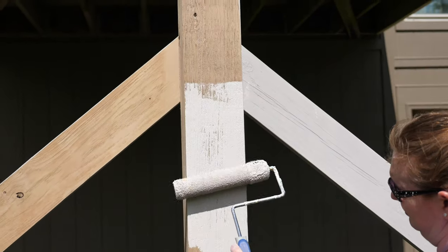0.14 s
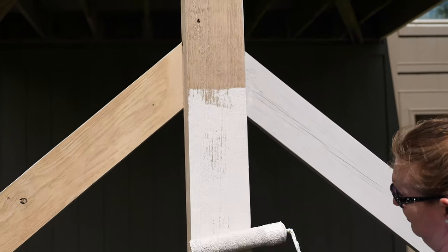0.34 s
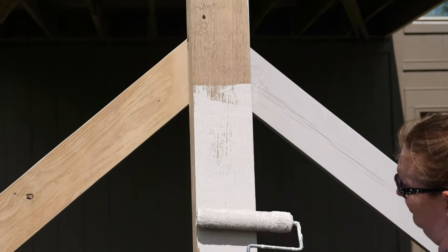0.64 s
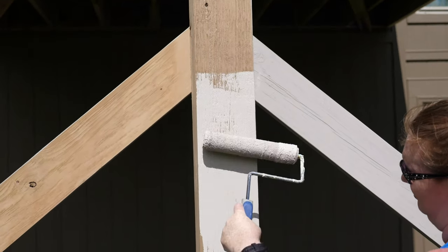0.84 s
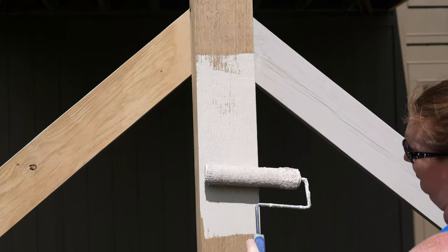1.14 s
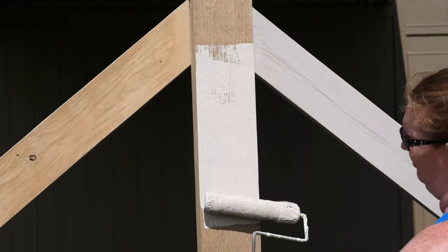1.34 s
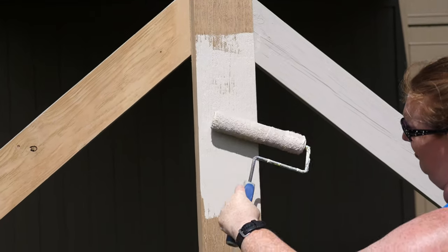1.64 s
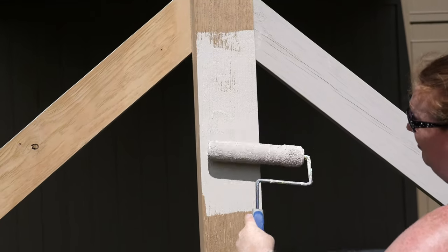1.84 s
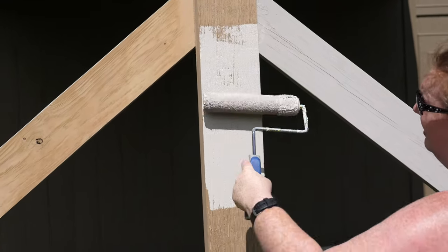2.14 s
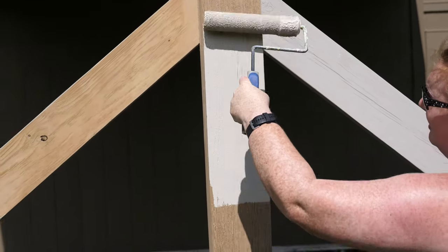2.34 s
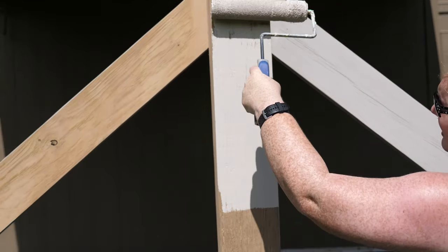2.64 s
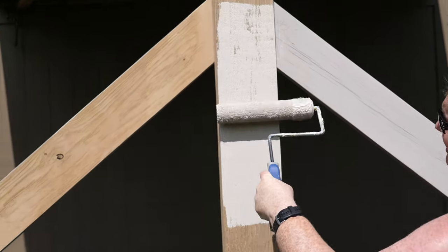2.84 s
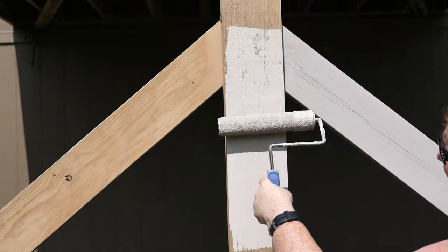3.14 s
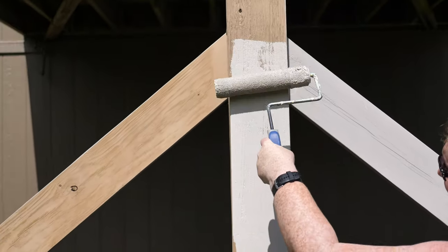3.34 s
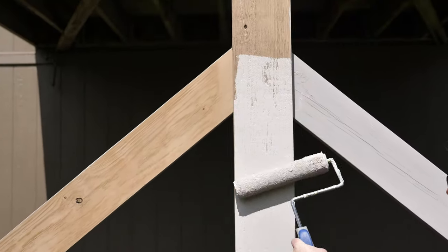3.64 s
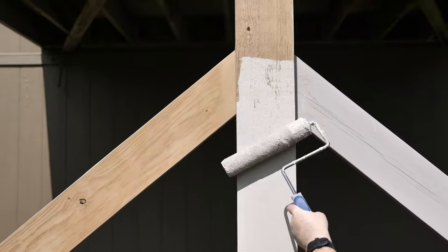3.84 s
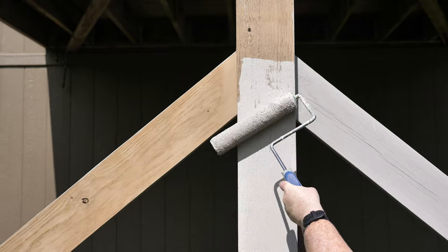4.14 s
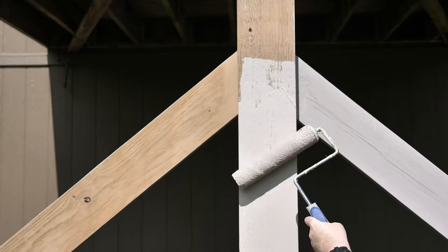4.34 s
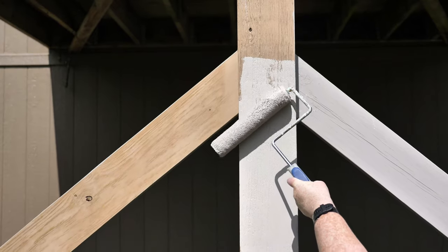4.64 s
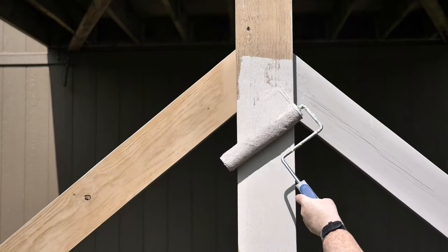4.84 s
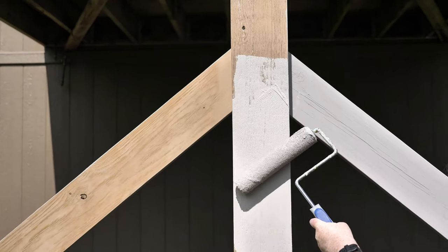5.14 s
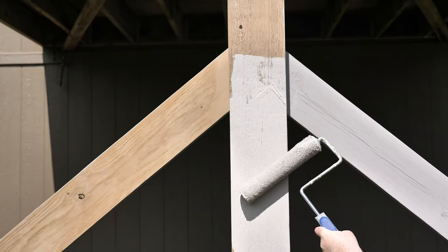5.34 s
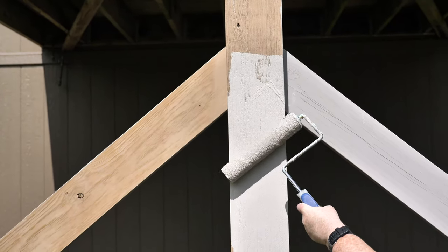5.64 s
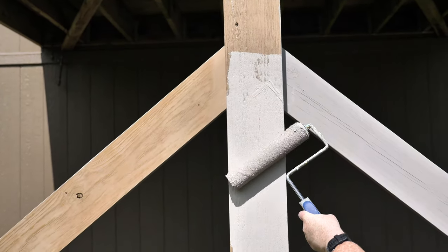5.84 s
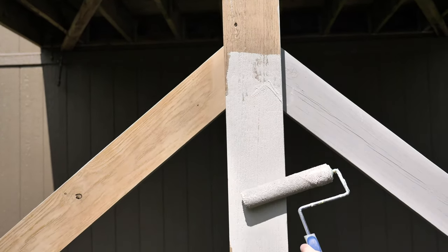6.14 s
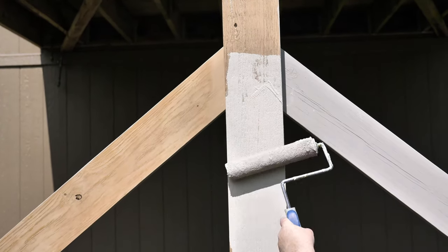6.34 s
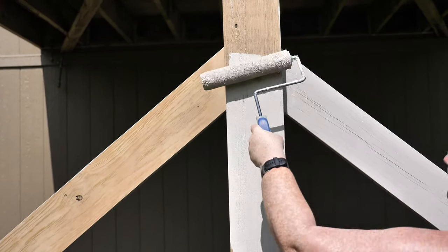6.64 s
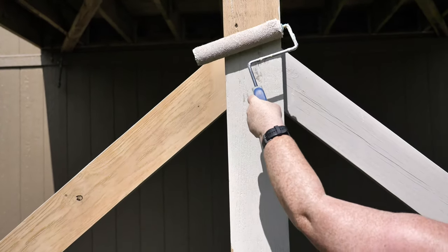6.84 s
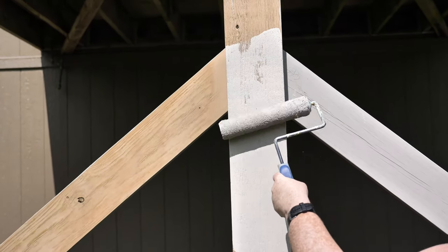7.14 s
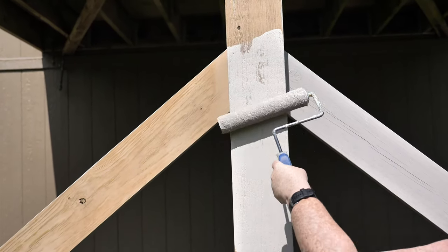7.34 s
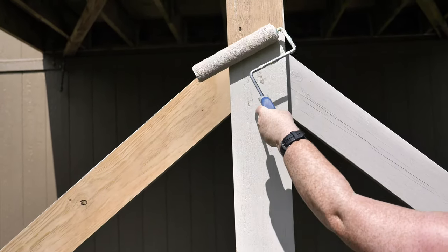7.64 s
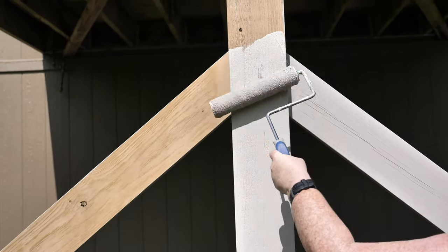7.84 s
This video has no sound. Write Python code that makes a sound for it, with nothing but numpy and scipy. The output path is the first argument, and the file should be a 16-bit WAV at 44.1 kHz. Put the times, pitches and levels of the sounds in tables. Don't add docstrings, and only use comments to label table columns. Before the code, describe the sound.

Close to the microphone, a wet paint roller strokes a wooden post with sticky, hissing crackle and small snaps. Strong wind rumble opens the scene and soon fades. A wren trills at the start and again midway, echoing off buildings. Later strokes grow faint, the handle judders dully, then the axle squeaks loudly and the roller knocks the wood. Low distant traffic continues outdoors.

```python
import sys
import numpy as np
from scipy import signal
from scipy.fft import rfft, irfft
from scipy.io import wavfile
from scipy.ndimage import uniform_filter1d

SR = 44100
rng = np.random.default_rng(int(sys.argv[2]) if len(sys.argv) > 2 else 0)


def attenuation_scalar(level_db):
    decades = np.asarray(level_db, float) / 20
    return 10 ** decades


def generate_wav(sig):
    pcm = np.round(np.clip(np.atleast_2d(sig).T, -1, 1) * 32767).astype(np.int16)
    wavfile.write(sys.argv[1], SR, pcm)


N = 353180

# (time [s], level [dB])
BREEZE = [(0.0, -6.5), (.3, -12.5), (.42, -11.5), (.56, -25), (1.0, -25), (1.4, -29), (2.0, -30),
          (2.9, -40), (3.5, -33), (3.9, -37), (4.4, -35.5), (5.2, -43), (5.9, -44), (6.6, -46),
          (7.2, -43.5), (8.01, -39.5)]
# (time [s], level above the breeze [dB])
PUFFS = [(.005, -2), (.18, 12.5), (.27, 10), (0.402, 9), (.69, 10.5), (.8, 10.5), (1.27, 9.5), (1.4, 7.5),
         (1.76, -3), (1.89, 2), (2.03, 5.5), (2.56, 8), (2.762, 11), (2.94, 1.5), (3.32, 14), (3.46, 5.5),
         (4.01, 6), (4.458, 8), (5.04, 9), (5.33, 15), (5.87, 9.5), (6.36, 6.5), (6.69, 7), (6.96, 9.5),
         (7.14, 4), (7.34, -5), (7.81, 5), (8.0, 8)]
PUFF_HALF_S = 0.032
# (frequency [Hz], density [dB per Hz])
WIND_SPECTRUM = [(4, 9.5), (8, 2), (18, 8.5), (31, -14), (45, -14), (62, -21.5), (113, -33), (300, -52),
                 (600, -96)]

# (frequency [Hz], density [dB per Hz])
YARD_SPECTRUM = [(26, -20), (45, -1), (120, -2.5), (173, -7), (210, -6.5), (334, -11), (495, -9.5),
                 (787, -11.5), (1680, -15.5), (2150, -21), (3500, -21), (5850, -37), (8870, -45.5),
                 (15600, -58)]
YARD_FLOOR_DB, CAPSULE_HISS_DB = -44, -77
# (frequency [Hz], width [Hz], level [dB])
MACHINES = [(133.6, 8, -54), (210, 13.6, -58)]
# (time [s], half length [s], level [dB])
PASSES = [(0.062, .04, -26), (.34, 0.08, -34), (0.713, 0.17, -50), (1.401, 0.093, -54), (2.475, .08, -46),
          (3.1, 0.11, -47), (3.91, 0.073, -38.5), (4.8, .04, -49), (5.682, 0.11, -50), (6.4, 0.35, -46.5),
          (7.154, .15, -41), (7.828, 0.23, -46)]
RUMBLE_HZ, RUMBLE_WIDTH_HZ, RUMBLE_BED_DB = 102, 44, -62
# (time [s], level [dB])
WHINE = [(0, -87), (6.2, -89), (6.6, -78), (7.9, -56.5), (8.01, -77)]
WHINE_HZ, WHINE_WIDTH_HZ = 764, 9

# (time in phrase [s], frequency [Hz], level [dB])
WREN_NOTES = [
    [(-.028, 2250, -2), (-.004, 2570, 7), (.006, 2570, 11)],
    [(.022, 2800, 6), (.040, 3070, -1), (.052, 3420, 5), (.064, 3740, 7.5), (.076, 3890, 3.5),
     (.092, 3970, -14)],
    [(.138, 4360, 0), (.145, 5290, 2), (.151, 5500, -11), (.164, 4100, -1)],
    [(.178, 3360, 3), (.188, 3160, 1), (.21, 3070, 0.5)],
    [(.229, 2920, 14.5), (.246, 2334, -1.5), (.284, 2270, -0.5)],
]
RISING_NOTE = 1
# (time [s], direct level [dB], level off the wall [dB], push on the rising note [dB],
# first note sung [index, rounded; negative counts from the end])
PHRASES = [
    (-.292, -60, -45, 0, 1),
    (0.099, -51.5, -48, 8.5, -1.5),
    (.494, -52.5, -47.5, 5, 0),
    (4.354, -56.5, -58, -3.5, 2),
    (4.745, -54, -53, 0.5, 0),
    (5.129, -51, -49.5, 0, 0.5),
    (5.513, -51, -48.5, 0.5, 0),
    (5.911, -55, -49, 2, 1),
]
# (time [s], frequency [Hz], level [dB])
FAR_CHIRP = [(6.719, 3900, -44), (6.736, 4600, -48), (6.752, 4900, -65), (6.767, 4420, -54),
             (6.78, 3800, -55)]
WALL_DELAY_S = 0.0245
WALL_FROM_HZ, WALL_GAIN_DB_OCT, WALL_DULL_HZ, WALL_DULL_DB = 2940, 16.5, 4000, -18
YARD_T60_S, YARD_DB, NEAR_T60_S, NEAR_DB = 0.86, -1.5, 0.24, -2

# (time [s], level [dB])
THUDS = [(5.468, -32), (5.487, -33), (5.512, -40), (5.535, -33), (5.558, -35.5), (5.580, -29),
         (5.606, -27.5), (5.635, -27), (5.652, -34), (5.665, -26.5), (5.679, -27)]
# (frequency [Hz], level [dB], t60 [s])
HANDLE_MODES = [(229, 3, 0.045), (133.5, -6, 0.068), (394, -4.5, 0.037)]
# (time [s], body level [dB], scuff length [s], scuff level [dB])
KNOCKS = [
    (1.824, -55, 0.074, -48),
    (1.845, -39, 0.047, -63),
    (4.001, -53, .02, -52),
    (4.536, -63, 0.017, -52),
    (7.562, -34.5, .02, -46),
    (7.575, -31, 0.039, -54),
]
# (frequency [Hz], level [dB], t60 [s])
POST_MODES = [(392, -41, 0.032), (580, -3, 0.21), (651, -2.5, 0.12), (895, -3, 0.023)]
# (frequency [Hz], level [dB], t60 [s])
FRAME_MODES = [(1420, 3.5, 0.0072), (1634, 1.5, 0.014), (2280, -5, 0.015), (3630, 4, 0.0028),
               (4300, -1, 0.0024)]
# (time of the top [s], frequency [Hz], half length [s], level [dB])
SQUEAKS = [
    (1.147, 5330, .006, -52),
    (1.147, 7600, .007, -48),
    (1.147, 10300, .007, -53),
    (2.012, 8000, .005, -60),
    (6.395, 10100, 0.019, -56),
    (6.631, 8420, 0.017, -26.5),
    (6.646, 14980, 0.0059, -47),
    (6.648, 14210, .003, -55),
    (6.67, 14800, .015, -66),
    (7.563, 3760, 0.0069, -41),
]
ROOF_DELAY_S, ROOF_DB = 0.037, -30
# (time [s], peak level [dB])
SNAPS = [(0.3775, -32), (1.4721, -40), (1.948, -52), (1.9894, -47), (2.2184, -34), (2.2922, -35),
         (2.3974, -33), (2.4733, -36), (3.2565, -43), (4.8539, -46), (5.9125, -46), (5.9494, -42),
         (5.9694, -49), (6.0043, -38), (6.0244, -48), (6.0626, -42), (6.0794, -42), (6.1197, -57),
         (6.2592, -47), (6.4817, -38)]
# (time when fastest [s], speeding up [s], slowing down [s], peel level [dB])
STROKES = [(0.012, .25, 0.31, -54), (0.415, .13, 0.16, -52), (.74, 0.19, 0.21, -56),
           (.87, 0.09, 0.15, -53.5), (1.154, 0.11, 0.11, -58.5), (1.273, 0.15, 0.14, -52),
           (1.606, 0.15, .14, -59.5), (1.987, 0.11, .06, -65), (2.174, 0.17, .07, -57.5),
           (2.31, 0.25, 0.35, -54.5), (2.79, 0.16, 0.11, -55.5), (2.925, 0.2, 0.16, -52),
           (3.31, .27, 0.15, -54), (3.67, .2, 0.13, -54.5), (3.985, .2, 0.16, -55.5),
           (4.32, 0.14, 0.095, -57), (4.565, 0.16, 0.11, -58), (4.84, 0.14, .28, -72),
           (5.196, 0.29, .27, -68.5), (5.675, .2, 0.22, -67.5), (6.036, 0.21, 0.19, -64.5),
           (6.27, 0.038, .05, -61.5), (6.455, 0.14, .17, -62), (6.6, 0.13, 0.17, -54.5),
           (6.75, 0.18, 0.15, -57.5), (7.15, 0.25, 0.25, -59.5), (7.45, 0.14, 0.22, -64),
           (7.62, 0.2, 0.12, -56.5), (7.89, 0.097, 0.14, -58.5), (7.975, 0.12, .24, -58.5)]
# (frequency [Hz], density [dB per Hz])
PEEL_SPECTRUM = [(300, -38), (543, -23), (1000, -1), (1520, 8), (2100, 2), (3400, 4.5), (4500, -4),
                 (5150, -6.5), (5800, -16.5), (6700, -6.5), (9000, -5), (10800, -10.5), (13000, -17.5),
                 (15700, -24)]
SPEED_POWER = 4.1
WOOD_DB, WOOD_FULL_S = 3, 0.287
THREADS_PER_S = 9000
SPLIT_HZ = 5700

DUCK_FROM_DB, DUCK_RELEASE_DB_S, DUCK_SHARE = -19, 25, 0.13


def rms_one(x):
    return x / np.sqrt(np.mean(x ** 2) + 1e-20)


def noise():
    return rng.standard_normal(N)


def butter(x, order, hz, kind="low"):
    return signal.sosfilt(signal.butter(order, hz, kind, fs=SR, output="sos"), x)


def in_time(curve):
    s, db = np.transpose(curve)
    return np.interp(np.arange(N) / SR, s, db)


def swell(s, half):
    return np.exp(-((np.arange(N) / SR - s) / half) ** 2)


def drift(rate):
    r = np.exp(-80 * np.pi * rate / SR)
    slow = signal.lfilter([1], [1, -2 * r, r * r], rng.standard_normal(N // 40 + 2002))
    slow = rms_one(slow[2000:])
    return np.interp(np.arange(N) / 40, np.arange(len(slow)), slow)


def colour(x, spectrum):
    hz, db = np.transpose(spectrum)
    grid = np.fft.rfftfreq(len(x), 1 / SR) + 1
    gain = attenuation_scalar(np.interp(np.log(grid), np.log(hz), db))
    return rms_one(irfft(rfft(x) * gain, len(x)))


def clicks(events):
    out = np.zeros(N)
    for s, db in events:
        out[round(s * SR)] += attenuation_scalar(db)
    return out


def ring(force, modes):
    out = np.zeros(N)
    for hz, db, t60 in modes:
        r = attenuation_scalar(-60 / (t60 * SR))
        w = 2 * np.pi * hz / SR
        out += signal.lfilter([0, attenuation_scalar(db) * np.sin(w)], [1, -2 * r * np.cos(w), r * r], force + 1e-18)
    return out


def hum(hz, width):
    mode = [(hz, 0, 1.52 / width)]
    return rms_one(ring(ring(noise(), mode), mode))


def far_yard():
    passing = attenuation_scalar(RUMBLE_BED_DB) + sum(attenuation_scalar(db) * swell(s, half) for s, half, db in PASSES)
    rumble = attenuation_scalar(-4) * passing * hum(RUMBLE_HZ, RUMBLE_WIDTH_HZ)
    machines = sum(attenuation_scalar(db) * hum(hz, width) for hz, width, db in MACHINES)
    whine = attenuation_scalar(in_time(WHINE)) * hum(WHINE_HZ, WHINE_WIDTH_HZ)
    wash = attenuation_scalar(YARD_FLOOR_DB + 0.5 * drift(1.0)) * colour(noise(), YARD_SPECTRUM)
    return rumble + machines + whine + wash + attenuation_scalar(CAPSULE_HISS_DB) * noise()


def wind():
    wind_db = in_time(BREEZE) + sum(db * swell(s, PUFF_HALF_S) for s, db in PUFFS)
    lumps = colour(noise(), WIND_SPECTRUM)
    lumps /= (uniform_filter1d(lumps ** 2, size=4400) + 0.082) ** 0.31
    pushed = 0.85 * np.tanh(attenuation_scalar(wind_db) * rms_one(lumps) / 0.96)
    return butter(pushed, 1, 2.5, "high")


def whistle(out, start, note, gain):
    s, hz, db = np.transpose(note)
    at = np.arange(round((start + s[0]) * SR), round((start + s[-1]) * SR))
    t = at / SR - start
    phase = 2 * np.pi * np.cumsum(np.interp(t, s, hz)) / SR
    tone = attenuation_scalar(np.interp(t, s, db)) * np.sin(phase) * signal.windows.tukey(len(at), 0.3)
    heard = at >= 0
    out[at[heard]] += gain * tone[heard]


def scatter(x, t60, db):
    t = np.arange(SR) / SR
    reflections = rng.standard_normal(SR) * (rng.random(SR) < 0.1)
    tail = reflections * attenuation_scalar(-60 * t / t60) * np.minimum(t / 0.01, 1)
    return attenuation_scalar(db) * signal.fftconvolve(x, tail / np.sqrt(np.sum(tail ** 2)))[:N]


def birds():
    song = np.zeros(N)
    for s, direct_db, wall_db, push_db, first in PHRASES:
        for number in range(len(WREN_NOTES))[round(first):]:
            note = WREN_NOTES[number]
            hz = np.mean(note, axis=0)[1]
            off_wall_db = wall_db + WALL_GAIN_DB_OCT * np.log2(hz / WALL_FROM_HZ)
            off_wall_db += WALL_DULL_DB * (hz > WALL_DULL_HZ)
            push = attenuation_scalar(push_db * (number == RISING_NOTE))
            whistle(song, s, note, push * attenuation_scalar(direct_db))
            whistle(song, s + WALL_DELAY_S, note, push * attenuation_scalar(off_wall_db))
    whistle(song, 0, FAR_CHIRP, 1)
    song *= attenuation_scalar(2.5 * drift(60) + 2.5 * drift(220))
    beamed = butter(song, 4, 4300, "high")
    direct = butter(song, 2, 4600)
    tails = scatter(song + beamed, NEAR_T60_S, NEAR_DB) + scatter(song, YARD_T60_S, YARD_DB)
    return direct + tails * attenuation_scalar(2.0 * drift(90))


def judder():
    return -attenuation_scalar(-1.5) * ring(butter(clicks(THUDS), 2, 350), HANDLE_MODES)


def knocks():
    scuff = np.zeros(N)
    for s, _, length, scuff_db in KNOCKS:
        i, n = round(s * SR), round(length * SR)
        rise = np.linspace(0, 6, n)
        scuff[i:i + n] += attenuation_scalar(scuff_db) * rise * np.exp(1 - rise) * rng.standard_normal(n)
    push = butter(clicks([(s, body_db) for s, body_db, _, _ in KNOCKS]), 2, 1000)
    post = ring(push + attenuation_scalar(-25) * scuff, POST_MODES)
    rattle = attenuation_scalar(-12.5) * ring(scuff, FRAME_MODES)
    hiss = attenuation_scalar(-16.0) * butter(scuff, 3, [700, 5000], "band")
    edge = attenuation_scalar(-39) * butter(scuff, 2, [6500, 11000], "band")
    return post + rattle + hiss + edge


def squeaks():
    out, t = np.zeros(N), np.arange(N) / SR
    for s, hz, half, db in SQUEAKS:
        near = np.abs(t - s) < 5 * half
        from_top = (t[near] - s) / half
        envelope = 1 / np.cosh(1.63 * from_top) ** 2
        bent_time = t[near] + 0.0001 * np.sin(from_top)
        out[near] += attenuation_scalar(db) * envelope * np.sin(2 * np.pi * hz * bent_time)
    return out + attenuation_scalar(ROOF_DB) * np.roll(out, round(ROOF_DELAY_S * SR))


def snaps():
    slope = np.exp(-1 / (0.007 * SR))
    burst = signal.lfilter([1], [1, -slope], clicks(SNAPS)) * noise()
    return attenuation_scalar(-10.5) * butter(burst, 2, [6500, 12500], "band")


def stroke_levels():
    t = np.arange(-0.1, N / SR + 0.1, 1 / 1000)
    peel, wood = np.zeros((2, len(t)))
    for fastest, rise, fall, peel_db in STROKES:
        ramp = np.interp(t, [fastest - rise, fastest, fastest + fall], [0, 1, 0])
        speed = np.sin(np.pi / 2 * ramp)
        power = attenuation_scalar(peel_db) ** 2 * speed ** SPEED_POWER
        peel += power
        wood += power * (attenuation_scalar(WOOD_DB) * min((rise + fall) / WOOD_FULL_S, 1)) ** 2
    linger = np.exp(-1 / 60)
    levels = []
    for power in (peel, wood):
        power = power + 0.033 * signal.lfilter([1 - linger], [1, -linger], power)
        smooth = uniform_filter1d(np.sqrt(power), size=35)
        levels.append(np.interp(np.arange(N) / SR, t, smooth))
    return levels


def roller():
    peel, into_wood = stroke_levels()
    sizes = attenuation_scalar(4.54 * np.minimum(rng.exponential(1, N), 5)) * rng.choice([-1, 1], N)
    threads = sizes * (rng.random(N) < THREADS_PER_S * attenuation_scalar(2.5 * drift(25)) / SR)
    crackle = colour(rms_one(threads) + 0.58 * noise(), PEEL_SPECTRUM) * attenuation_scalar(0.63 * drift(5.7))
    top = butter(crackle, 4, SPLIT_HZ, "high")
    wood = butter(crackle, 4, SPLIT_HZ)
    return (peel * top + attenuation_scalar(-5) * into_wood * wood) / np.std(top)


def scene():
    background = far_yard() + birds()
    near = judder() + knocks() + squeaks() + snaps() + roller()
    lean = attenuation_scalar(np.array([[0.1], [-0.1]]))
    return background + near + wind() * lean


def band_limit(x):
    return signal.sosfilt(signal.butter(12, 15710, fs=SR, output="sos"), x)


def record(dry):
    level_db = 10 * np.log10(uniform_filter1d(dry[0] ** 2, size=2205) + 1e-12)
    fall = DUCK_RELEASE_DB_S * np.arange(N) / SR
    held_db = np.maximum.accumulate(level_db + fall) - fall
    duck_db = -DUCK_SHARE * np.maximum(held_db - DUCK_FROM_DB, 0)
    return band_limit(dry * attenuation_scalar(duck_db))


dry = scene()
out = record(dry)
generate_wav(out)
```